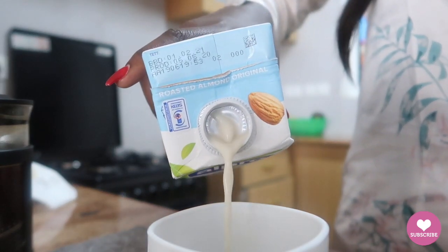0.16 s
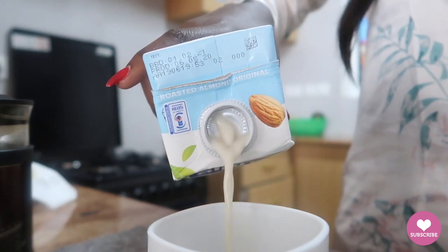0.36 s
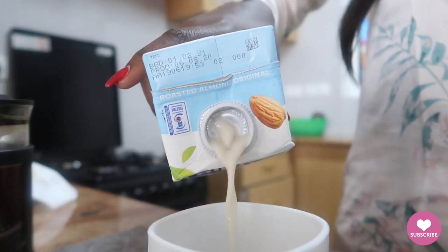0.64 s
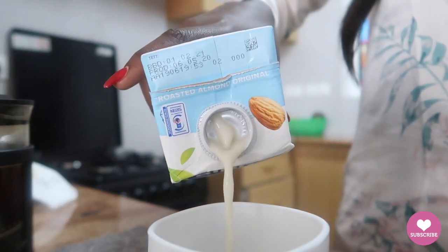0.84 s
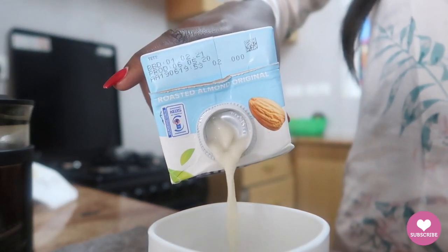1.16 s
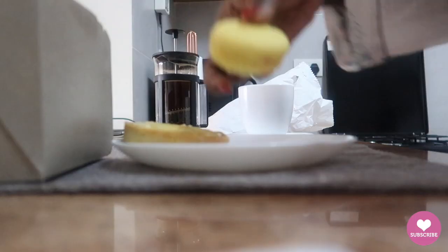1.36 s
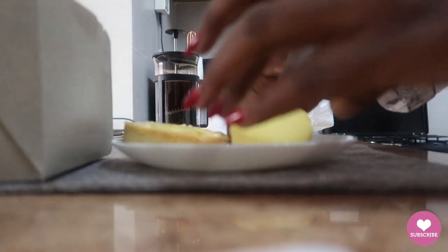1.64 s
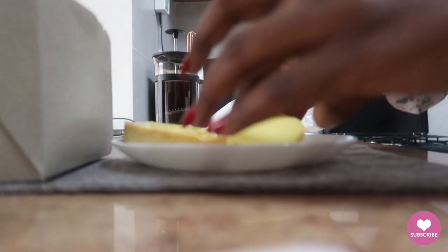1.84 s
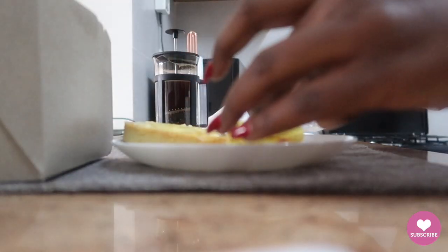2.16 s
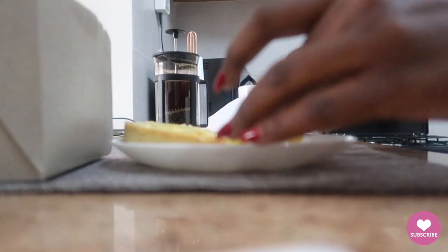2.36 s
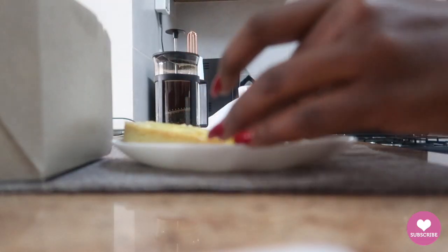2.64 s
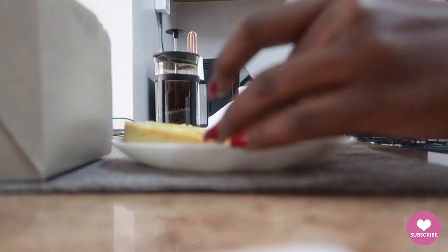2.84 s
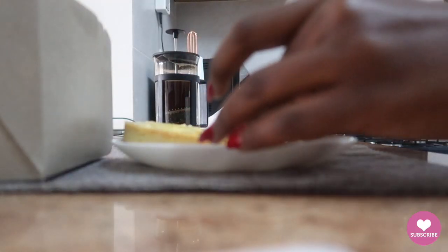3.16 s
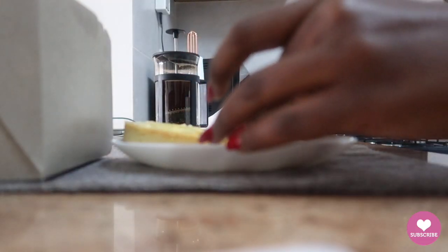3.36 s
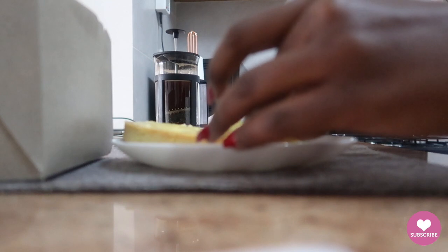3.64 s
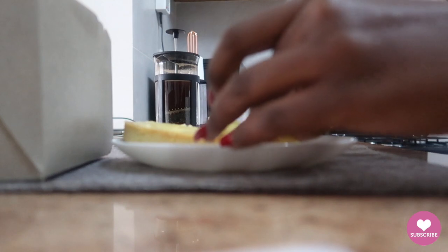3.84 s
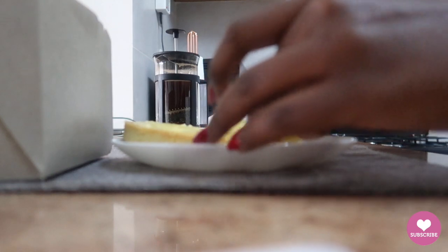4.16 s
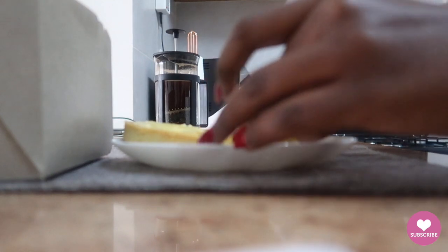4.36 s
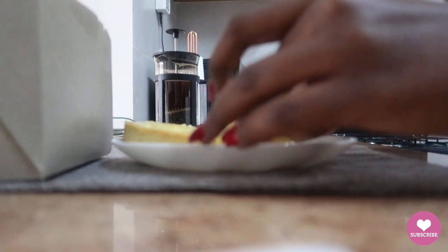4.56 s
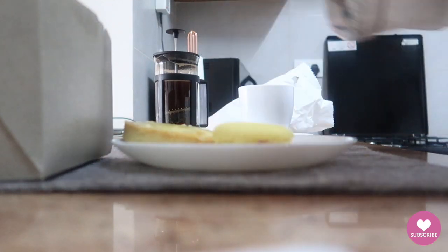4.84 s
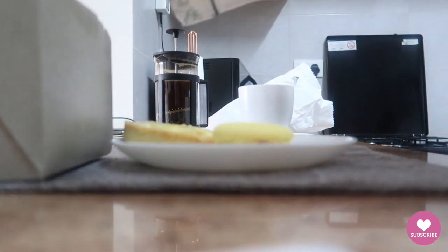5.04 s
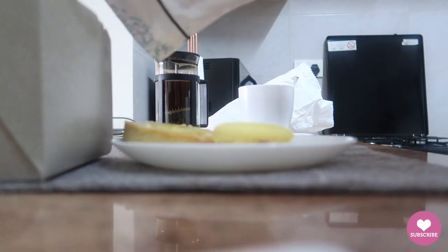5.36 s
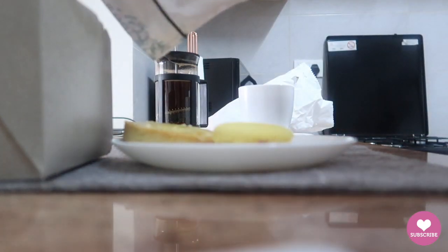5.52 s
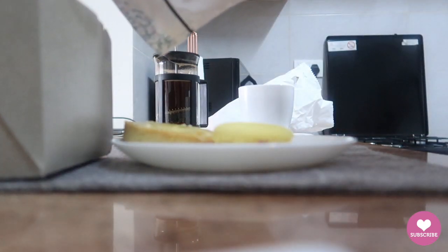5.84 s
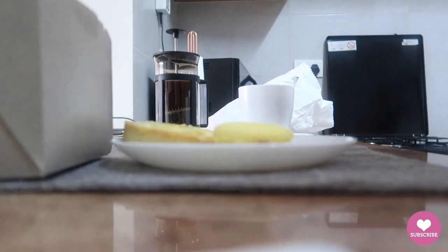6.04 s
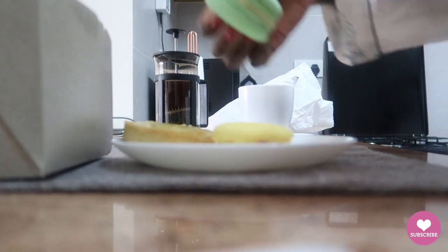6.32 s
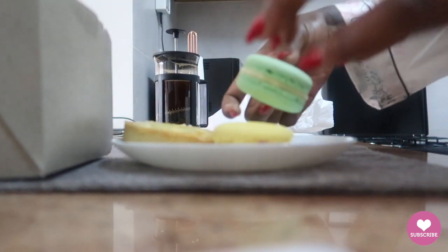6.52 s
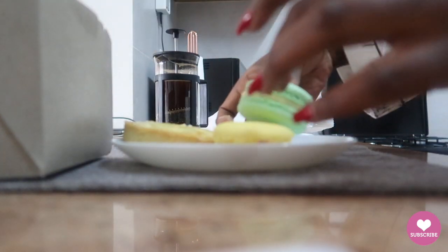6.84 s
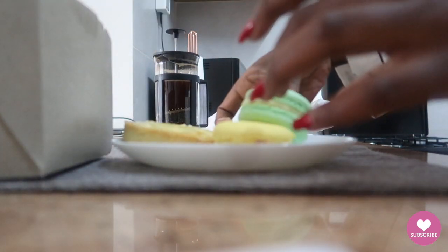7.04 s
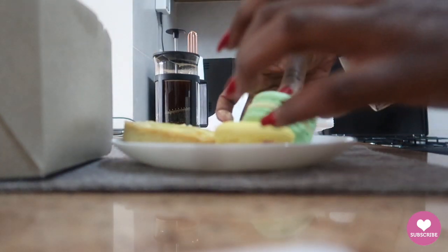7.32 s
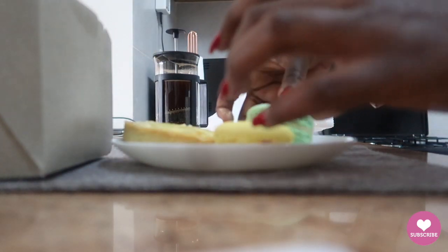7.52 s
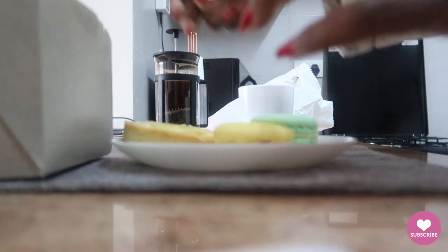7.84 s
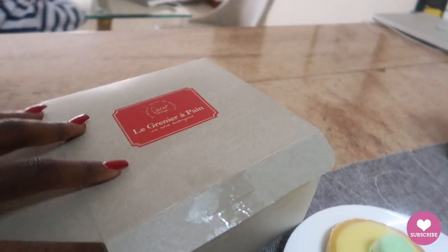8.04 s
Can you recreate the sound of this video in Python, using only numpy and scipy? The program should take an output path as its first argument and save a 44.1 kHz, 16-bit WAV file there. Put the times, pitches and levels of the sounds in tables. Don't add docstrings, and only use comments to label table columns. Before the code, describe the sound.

Quiet kitchen hum, then a low lumpy drum thumping two turns a second, with nearby paper rustles, sharp wrapper crackles, china ticks and a final cardboard rub.

```python
import sys
import numpy as np
from scipy import signal
from scipy.fft import rfft, irfft, next_fast_len
from scipy.io import wavfile
from scipy.ndimage import uniform_filter1d

SR = 44100
rng = np.random.default_rng(int(sys.argv[2]) if len(sys.argv) > 2 else 0)


def to_wav(s):
    ch = np.atleast_2d(s).T
    pcm = np.round(np.clip(ch, -1, 1) * 32767)
    wavfile.write(sys.argv[1], SR, pcm.astype(np.int16))


def invert_db(x):
    u = np.asarray(x, float) / 20
    return 10 ** u


N = 360958


def on_log(table, hz):
    f, v = np.transpose(table)
    return np.interp(np.log(np.maximum(hz, 1)), np.log(np.maximum(f, 1)), v)


def colour(x, table):
    size = next_fast_len(x.shape[-1])
    hz = np.arange(size // 2 + 1) * SR / size
    return irfft(rfft(x, size) * invert_db(on_log(table, hz)), size)[..., :x.shape[-1]]


def level(x, db):
    return x * invert_db(db) / np.sqrt(np.mean(x ** 2))


def band(x, hz, width):
    b, a = signal.iirpeak(hz, hz / width, fs=SR)
    return signal.lfilter(b, a, x)


def decay(t, t60):
    return np.exp(-np.log(1000) * t / t60)


def walk(rate):
    k = int(SR / rate)
    held = np.repeat(rng.standard_normal(N // k + 1), k)
    return 1.1 * uniform_filter1d(uniform_filter1d(held, k), k)[:N]


def echoes(x, t60, db, top_hz):
    t = np.arange(SR // 2) / SR
    tail = rng.standard_normal((2, len(t))) * decay(t, t60) * (t > .004)
    tail = signal.lfilter(*signal.butter(1, top_hz, fs=SR), tail)
    tail = tail * invert_db(db) / np.sqrt(np.sum(tail[0] ** 2))
    return signal.fftconvolve(x[None], tail, axes=1)[:, :N]


# frequency in Hz, level in dB per Hz.
ROOM = [(12, -14.5), (20, -4), (31, -5.5), (44, -16), (103, -7.5), (119, -10.5), (297, -18.5), (630, -27),
        (1920, -32.5), (2270, -34.5), (2830, -36), (12400, -54.5), (15400, -67)]
ROOM_DB = -47.5
# frequency in Hz, side against middle in dB.
ROOM_SIDE = [(60, -36.5), (110, -31), (200, -11), (380, -2), (700, -0.5), (1290, -1), (2380, -2), (4400, 2),
             (8120, 2.5), (15000, 1)]
HUM_HZ, HUM_DB = 48.8, -60.5


def room():
    mid, side = colour(rng.standard_normal((2, N)), ROOM)
    side = colour(side, ROOM_SIDE)
    scale = invert_db(ROOM_DB) / np.sqrt(np.mean(mid ** 2))
    hum = band(band(rng.standard_normal(N), HUM_HZ, width=7.1), HUM_HZ, width=7.1)
    waver = invert_db(0.8 * walk(2.8))
    return level(hum, HUM_DB) + scale * waver * np.array([mid + side, mid - side])


MAIN_BUMP = 6


def bumps(table, turns, size, wander_s, scatter_db, rise, tail, linked, accent_db=0):
    tape = np.zeros((turns + 2) * size)
    s_all, hz_all = np.array([row[:2] for row in table]).T
    between_hz = (hz_all + np.roll(hz_all, 1)) / 2
    swing = 2 * np.pi * np.cumsum(np.diff(s_all, prepend=0) * between_hz)
    swing = swing - swing[min(MAIN_BUMP, len(table) - 1)] + np.pi
    chance = rng.standard_normal((len(table), turns, 3))
    accents = accent_db + np.zeros((len(table), turns))
    for (s, hz, db, cycles), c, carried, accent in zip(table, chance, swing, accents):
        spread = cycles / hz
        t = np.arange(-3 * spread, 8 * spread, 1 / SR)
        swell = np.exp(-t ** 2 / (2 * (rise * spread) ** 2))
        shape = np.where(t < 0, swell, 1 / np.cosh(t / (tail * spread)))
        slip = np.cumsum(wander_s * c[:, 0])
        start = carried if linked else 3 * c[0, 2]
        for k in range(turns):
            turn_hz = hz * (1 + .012 * c[k, 1])
            ring = np.cos(2 * np.pi * turn_hz * (t - slip[k]) + start)
            i = int((k + 1) * size + (s - 3 * spread) * SR)
            tape[i:i + len(t)] += invert_db(db + accent[k] + scatter_db * c[k, 2]) * shape * ring
    return tape[size:-size]


# seconds into the turn, ring in Hz, peak in dB, spread in cycles.
BUMPS = [(.0415, 113, -24.5, 1.25), (.082, 90.7, -30.5, 1.56), (.132, 118, -30, 1.9),
         (.155, 170.6, -27, 1.17), (.19, 140, -30, 1.1), (.222, 135, -30, 1.3), (.2525, 127, -19, 0.62),
         (.275, 135.7, -27, 0.61), (.297, 190.1, -33, 1.47), (.325, 120, -29, 1.0), (.36, 168, -29, .67),
         (.395, 174.6, -27.5, 0.99), (.41, 118.7, -28.5, 0.9033), (.443, 124.8, -34, .8),
         (.466, 151, -29.5, 0.5), (.486, 94.6, -32.5, 1.2)]
LATE_TURNS = [2, 4, 6, 12]
LATE_DB = 3.5


def cabinet_thuds(turns, size):
    late_db = np.zeros((len(BUMPS), turns))
    late_db[MAIN_BUMP, LATE_TURNS] = -LATE_DB
    late_db[MAIN_BUMP + 1, LATE_TURNS] = LATE_DB
    return bumps(BUMPS, turns, size, wander_s=0.00016, scatter_db=0.7, rise=.95, tail=1.0,
                 linked=True, accent_db=late_db)


# seconds into the turn, peak in dB.
DEEP = [
    (.005, -45),
    (.128, -45),
    (.18, -39.5),
    (.248, -33.5),
    (.315, -36),
    (.371, -33.5),
    (.42, -36),
]
FLOOR_HZ, FLOOR_CYCLES = 66, .75


def floor_bumps(turns, size):
    rows = [(s, FLOOR_HZ, db, FLOOR_CYCLES) for s, db in DEEP]
    return bumps(rows, turns, size, wander_s=0.00048, scatter_db=0.0, rise=0.92, tail=0.94, linked=False)


# seconds into the turn, ring in Hz, peak in dB.
RATTLES = [(.004, 520, -36), (.034, 294, -36), (.082, 316, -38.5), (.116, 464, -31.5), (.116, 560, -40),
           (.135, 457, -34), (.134, 802, -37), (.151, 547, -34), (.172, 393, -38), (.218, 1007, -38.5),
           (.232, 388.5, -32), (.252, 288, -30.5), (.291, 825.5, -43.5), (.296, 299.8, -36),
           (.312, 877.5, -44), (.328, 274, -37), (.369, 422, -37.5), (.39, 454, -39.5), (.423, 345, -40.5),
           (.464, 366, -44.5), (.042, 195, -38), (.122, 190, -35), (.193, 190, -36), (.219, 190, -35),
           (.257, 200, -31), (.432, 190, -38), (.229, 830, -38), (.238, 900, -38), (.238, 1150, -43),
           (.254, 1200, -44), (.289, 1120, -48), (.306, 1140, -50), (.321, 1100, -51), (.346, 1120, -51),
           (.366, 1050, -53), (.139, 1050, -51), (.037, 800, -49), (.05, 800, -49), (.338, 830, -47),
           (.368, 830, -46), (.305, 330, -36)]
RATTLE_CYCLES, CYCLES_PER_OCTAVE = 1.63, 0.34


def panel_rattles(turns, size):
    rows = [(s, hz, db, RATTLE_CYCLES + CYCLES_PER_OCTAVE * np.log2(hz / 500)) for s, hz, db in RATTLES]
    return bumps(rows, turns, size, wander_s=0.00018, scatter_db=0.86, rise=0.62, tail=1.72, linked=False)


def repeating(turns, size, keep):
    keep = np.clip(keep, 0, .98)
    fresh = rng.standard_normal((turns, size))
    gain = np.sqrt(1 - keep ** 2)
    return signal.lfilter([gain], [1, -keep], fresh, axis=0, zi=keep * fresh[-1:])[0].ravel()


# seconds into the turn, load in dB.
LOAD = [(0, 1.5), (0.098, -5), (0.127, 3), (0.198, 1), (0.244, 5), (.3, 1), (.4, -0.5), (.4994, -6.5)]
# resonance in Hz, width in Hz, level in dB.
PANELS = [(462, 70, -1.5), (564.82, 75, -5), (824, 46, 3), (984.94, 38, 0), (1135, 80, -5), (1308, 52, -16),
          (2080, 450, -22.5)]
SMALL_PANEL_HZ = 1050
# seconds into the turn, peak in dB, extra dB on the small panels.
JOLTS = [
    (.117, -47, -13),
    (.13, -44, -12),
    (.175, -57, -6),
    (.215, -47.5, 4),
    (.236, -44.5, 4.5),
    (0.291, -53, 4),
    (.33, -57, 8),
    (.368, -53, 0),
    (.4, -56.5, 0),
]
JOLT_RISE_S, JOLT_T60_S = .004, 0.13
SHAKE_DB, SHAKE_PER_LOAD = -58, 1.4


def panels(turns, size):
    knocks, t = repeating(turns, size, keep=0.61), np.arange(size) / SR
    large = small = invert_db(SHAKE_DB + SHAKE_PER_LOAD * np.interp(t, *np.transpose(LOAD)))
    for s, db, small_db in JOLTS:
        rise = np.clip((t - s) / JOLT_RISE_S + 1, 0, 1)
        jolt = rise * invert_db(db - 60 * np.maximum(t - s, 0) / JOLT_T60_S)
        large, small = large + jolt, small + invert_db(small_db) * jolt
    modes = [invert_db(db) * band(band(knocks, hz, 2 * width), hz, 2 * width) for hz, width, db in PANELS]
    modes = level(np.array(modes), -8)
    out = 0
    for mode, (hz, _, _) in zip(modes, PANELS):
        out = out + mode * np.tile(small if hz > SMALL_PANEL_HZ else large, turns)
    return out


# frequency in Hz, level in dB per Hz.
ROLL = [(15, -25), (25, -35), (44, -11.5), (95, -5), (123, 1.5), (224, -5.5), (280, -8.5), (350, -16),
        (477, -19), (680, -26.5), (777, -26.5), (1260, -39.5), (5000, -62.5), (6500, -64.5), (11000, -120)]
ROLL_DB = -37.5


def rolling(turns, size):
    low = signal.butter(2, 250, fs=SR, output="sos")
    coarse = signal.sosfiltfilt(low, repeating(turns, size, keep=0.90391))
    fine = repeating(turns, size, keep=0.59)
    fine = fine - signal.sosfiltfilt(low, fine)
    load_db = np.tile(np.interp(np.arange(size) / SR, *np.transpose(LOAD)), turns)
    rough = coarse * invert_db(0.32 * load_db - 6) + fine * invert_db(load_db + 2.5)
    return level(colour(rough, ROLL), ROLL_DB)


TURN_S, TURNS = .4991, 16
# from in seconds, to in seconds, start of a turn in seconds, level in dB.
HEARD = [
    (1.397, 7.965, 1.06, 1.5),
    (7.963, 8.3, 7.598, 1.5),
]
# time in seconds, lag in seconds.
SLIP = [(1.4, .004), (2.1, .002), (3.1, .001), (4.1, 0), (5.2, -.001), (6.2, .0005), (8.2, .002)]
# frequency in Hz, side against middle in dB.
DRUM_SIDE = [(60, -62.5), (110, -108), (200, -49), (380, -20.5), (700, -23.5), (1290, -13.5), (2380, -13),
             (4400, 0), (8120, 0), (15000, 2)]


def drum():
    size = int(round(TURN_S * SR))
    tape = cabinet_thuds(TURNS, size) + floor_bumps(TURNS, size) + panel_rattles(TURNS, size)
    tape = tape + panels(TURNS, size) + rolling(TURNS, size)
    t, mid = np.arange(N) / SR, np.zeros(N)
    lag = np.interp(t, *np.transpose(SLIP))
    for start, end, zero, db in HEARD:
        gate = np.clip((t - start) / 0.00606, 0, 1) * np.clip((end - t) / 0.0036 + 1, 0, 1)
        mid += invert_db(db) * gate * np.interp((t - zero - lag) * SR, np.arange(len(tape)), tape)
    wet = echoes(mid, t60=0.27, db=-2.5, top_hz=9000)
    wet = signal.lfilter(*signal.butter(2, 350, "high", fs=SR), wet)
    side = colour(wet[0], DRUM_SIDE)
    lean = band(band(mid, hz=850, width=1300), hz=850, width=1300)
    return mid + invert_db(-9.5) * wet[1] + np.array([side, -side]) + np.array([[-.13], [.13]]) * lean


# start in seconds, peak in dB, top in Hz, t60 in seconds,
# low knock in dB against the peak.
TAPS = [(1.431, -46, 2535, .02, 5), (4.488, -38, 6000, .0064, -20), (6.2712, -48, 3000, .02, -12),
        (7.1297, -37, 9000, .0071, -20), (7.3807, -35, 3200, .012, 5), (7.659, -47, 3000, .015, -10),
        (7.689, -43, 1897, .04, -11), (7.7005, -36, 3200, .012, -3), (7.704, -37, 1650, .02, -5),
        (7.710, -35, 2000, .016, -3), (7.7105, -41, 5000, .012, -9), (7.7195, -41, 5500, .01, -9.5),
        (7.731, -44, 3000, .012, -10), (7.768, -39, 1500, .02, -8), (7.784, -40, 3400, .01, -12),
        (8.011, -33.5, 1700, .02, 5.5), (8.084, -38, 3600, .01, -15), (8.109, -36, 5000, .02, -15),
        (8.165, -34, 4200, .02, -15)]
WRAPPER = [(5.3588, -37, 2300, 0.012, 3), (5.4196, -27, 3600, 0.01447, -5), (5.4215, -34, 1900, .02, -8),
           (5.5451, -17, 4400, 0.006526, 0), (5.5455, -22.5, 2200, .008, -12),
           (5.5555, -31, 3300, .011, -6), (5.5612, -36, 4400, .008, -2), (5.566, -36, 3000, .009, -4),
           (5.577, -44, 4000, .04, 8), (5.589, -47, 4200, .04, 12), (5.598, -42, 1100, .05, 2),
           (5.607, -48, 4000, .03, 13), (5.618, -43, 5000, .012, -12), (5.622, -39, 2600, .012, -12),
           (5.6255, -34, 4400, .018, -18), (5.630, -35, 4600, .014, -18), (5.634, -38, 2600, .01, -12),
           (5.644, -45, 4500, .012, -15), (5.7515, -32, 1050, 0.02, -2), (5.781, -36, 1050, .02, -1),
           (5.788, -37, 1300, .025, -3), (5.821, -44, 1800, .015, -8), (5.833, -40, 1800, .02, -10),
           (5.838, -32, 2100, .016, -12), (5.841, -36, 3000, .012, -12), (5.844, -37, 5200, .014, -12),
           (5.852, -34, 1900, .02, -10), (5.856, -35, 3200, .012, -10), (5.860, -39, 2400, .015, -10)]
TAPS_PAN_DB, WRAPPER_PAN_DB = -.4, 3.5
# resonance in Hz, width in Hz, level in dB.
BODY = [(1250, 200, -3), (1800, 210, 8), (2540, 200, 1), (3480, 250, 4), (4350, 300, 3), (5600, 300, -1),
        (7170, 300, 5)]
CRACK_LOW_SHARE = 0.4


def cracks():
    out, t = np.zeros((2, N + SR)), np.arange(SR // 8) / SR
    dull = signal.butter(2, 6500, fs=SR, output="sos")
    hollow = signal.butter(2, [230, 700], "band", fs=SR, output="sos")
    rows = [(*row, WRAPPER_PAN_DB) for row in WRAPPER] + [(*row, TAPS_PAN_DB) for row in TAPS]
    noises = rng.standard_normal((len(rows), 2, len(t)))
    for (s, db, top_hz, t60, knock_db, pan_db), noise in zip(rows, noises):
        edges = signal.butter(2, [CRACK_LOW_SHARE * top_hz, top_hz], "band", fs=SR, output="sos")
        snap = noise[0] - 0.085 / t60 * (t == 0)
        burst = signal.sosfilt(edges, snap * decay(t, t60))
        body = sum(invert_db(ring_db) * band(burst, hz, width) for hz, width, ring_db in BODY)
        burst = .35 * burst + body
        thump = noise[1] - .08 / t60 * (t == 0)
        knock = signal.sosfilt(hollow, thump * decay(t, t60 + 0.007))
        both = burst / np.abs(burst).max() + invert_db(knock_db) * knock / np.abs(knock).max()
        pan = np.array([[pan_db], [-pan_db]]) / 2
        i = int(s * SR)
        out[:, i:i + len(t)] += invert_db(db + pan) * signal.sosfilt(dull, both)
    return out[:, :N]


def grains(uneven_db):
    sizes = np.minimum(rng.exponential(size=N // 40 + 1), 3.5).repeat(40)[:N]
    mid, side = rng.standard_normal((2, N)) * invert_db(uneven_db * sizes)
    side = invert_db(-10) * colour(side, ROOM_SIDE)
    return np.array([mid + side, mid - side])


# peak in seconds, level in dB, seconds to swell by 20 dB,
# seconds to fade by 20 dB.
STIRS = [(1.535, -59, 0.3, 0.4), (1.8, -65, 0.2927, 0.5), (2.187, -53, 0.0347, .15), (2.275, -57, .15, .3),
         (3.3, -70, 1, 0.473), (4.7, -60.5, 0.15, 0.5), (4.85, -64.5, 0.4366, 0.255), (5.43, -62, 0.1, .5),
         (5.575, -54, 0, .3), (5.85, -50, 0.0214, 0.0802), (6.3, -62, 0.6, 0.1248), (6.82, -58, 0.1, .5),
         (7.39, -57.5, 0.13, .35), (7.71, -55, 0.02, 0.03), (7.79, -55.5, 0.065, .1)]
# frequency in Hz, level in dB per Hz.
PAPER = [(700, -12), (1300, 0.5), (2400, 0), (3300, -4.5), (4700, -11), (7000, -19), (12000, -35),
         (15500, -50)]


def paper_stirs():
    t, stirring = np.arange(N) / SR, 0
    for s, db, swell_s, fade_s in STIRS:
        stirring = stirring + invert_db(db - 20 * np.maximum((s - t) / swell_s, (t - s) / fade_s))
    return level(colour(grains(uneven_db=3.5), PAPER), 1.3) * stirring


# start in seconds, peak in dB, lowest mode in dB against it,
# tilt of the upper modes in dB per octave.
TICKS = [(1.745, -61, 0, -20), (1.755, -59, -12, -9), (1.7785, -66, 3, 5), (1.8439, -55.5, 5, 0),
         (1.853, -56, -13, -18), (1.873, -57, -12, -25), (2.384, -54.5, 5, -16), (4.4871, -50.5, 3, -19),
         (7.13, -53.5, 5, 1), (7.141, -58, -8, -20), (7.2293, -64, 0, -6), (7.382, -55, 6, -18),
         (7.392, -56, 2, -10), (7.7832, -66, 11, 0)]
# frequency in Hz, level in dB, t60 in seconds.
PLATE = [(3027.1, 1.5, 0.079), (4640, -3.5, 0.33), (5500, -2.5, 0.085), (6772.6, -1, 0.1817),
         (8700, -5.5, 0.15), (9735, -8, .2), (11040, -10, .2), (12400, -17, .05), (13600, -19, .1)]


def plate():
    out, t = np.zeros(N + SR), np.arange(SR // 2) / SR
    chance = rng.standard_normal((len(TICKS), len(PLATE), 2))
    for (s, db, low_db, tilt_db), c in zip(TICKS, chance):
        for (hz, mode_db, t60), (a, b) in zip(PLATE, c):
            share_db = low_db if hz == PLATE[0][0] else tilt_db * np.log2(hz / PLATE[1][0])
            ring = np.sin(2 * np.pi * hz * (1 + 0.004345 * a) * t) * np.clip(t / 0.00025, 0, 1)
            ring = ring * (decay(t, 0.29 * t60) + 0.3 * decay(t, 2.0 * t60))
            out[int(s * SR):][:len(t)] += invert_db(db + share_db + mode_db + 2 * b) * ring
    return out[:N]


# time in seconds, level in dB.
RUB = [
    (7.955, -76),
    (7.965, -49),
    (7.981, -52),
    (8.005, -47.5),
    (8.037, -47.5),
    (8.075, -44),
    (8.115, -42),
    (8.18, -42.5),
]
# frequency in Hz, level in dB per Hz.
CARD = [(500, -12.5), (700, 2), (950, -2), (1200, 2), (1400, -5.5), (1750, -2), (2300, -3), (3000, -4),
        (3600, 1), (4100, -3), (4900, -6), (5800, -16.5), (9000, -39)]
# frequency in Hz, level in dB per Hz.
SKIN = [(4000, -30), (6000, -2.5), (8000, 7), (11000, -3), (14000, -11), (16000, -32)]
SKIN_DB = -19.5


def card_rub():
    t, (s, db) = np.arange(N) / SR, np.transpose(RUB)
    gate = np.clip((t - s[0]) / 0.025, 0, 1) * np.clip((s[-1] - t) / 0.03 + 1, 0, 1)
    card = level(colour(grains(uneven_db=2.2), CARD), 1.2) * invert_db(walk(50))
    skin = level(colour(grains(uneven_db=1.5), SKIN), SKIN_DB)
    return (card + skin) * gate * invert_db(np.interp(t, s, db))


def scene():
    near = cracks() + paper_stirs() + plate() + card_rub()
    return room() + drum() + near + echoes(near.mean(axis=0), t60=0.16, db=-13.5, top_hz=5000)


def low_pass(x):
    return signal.sosfilt(signal.butter(12, 15200, fs=SR, output="sos"), x)


def record(dry):
    return low_pass(dry)


dry = scene()
out = record(dry)
to_wav(out)
```